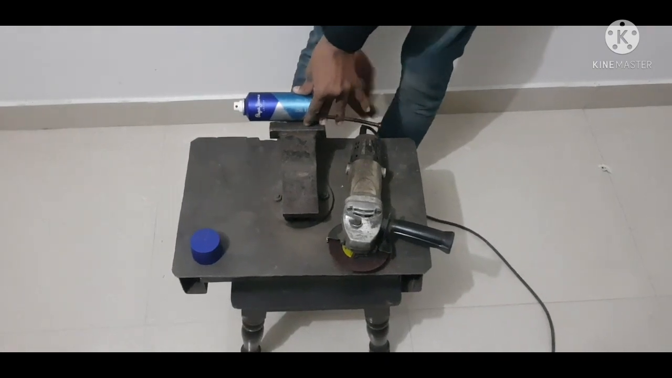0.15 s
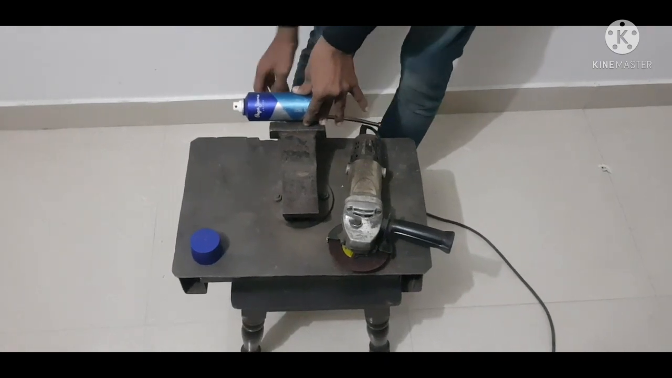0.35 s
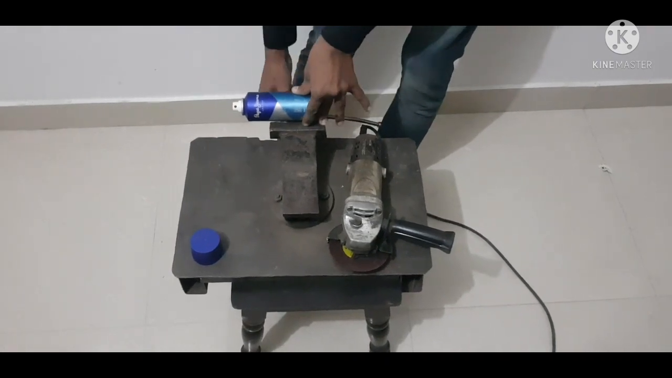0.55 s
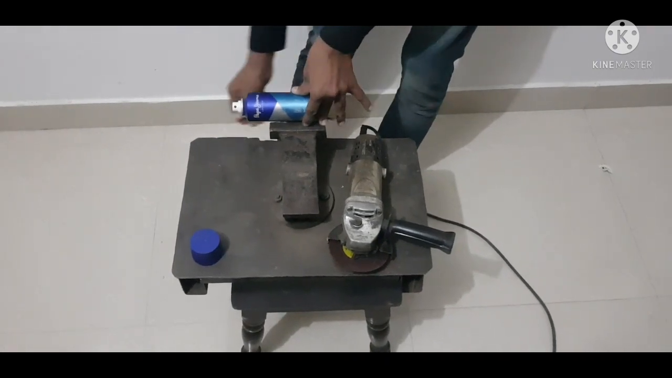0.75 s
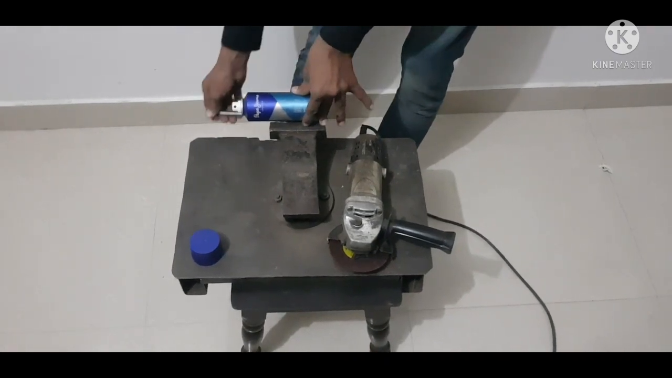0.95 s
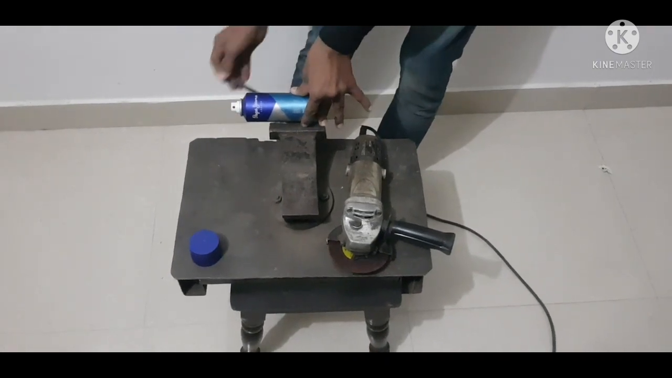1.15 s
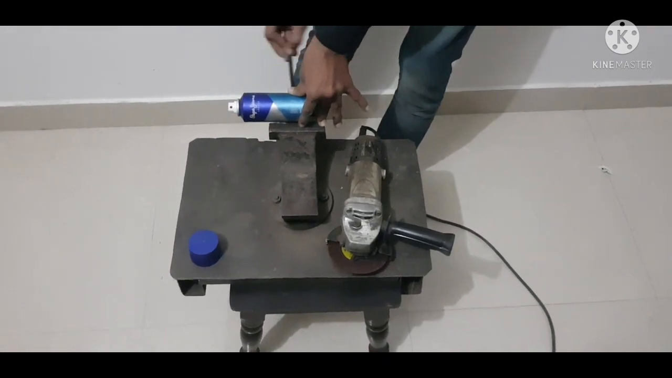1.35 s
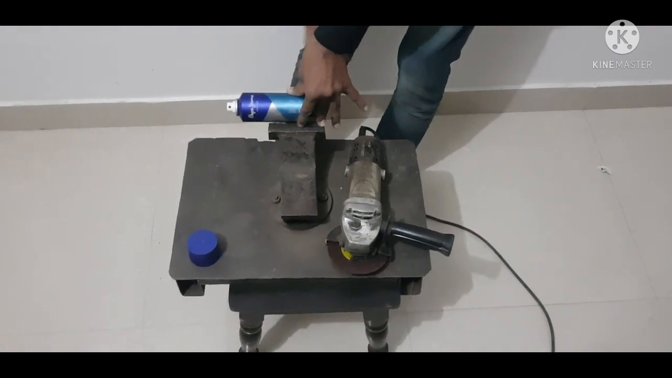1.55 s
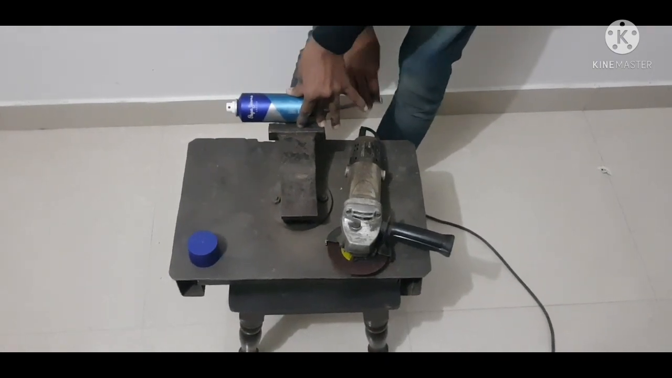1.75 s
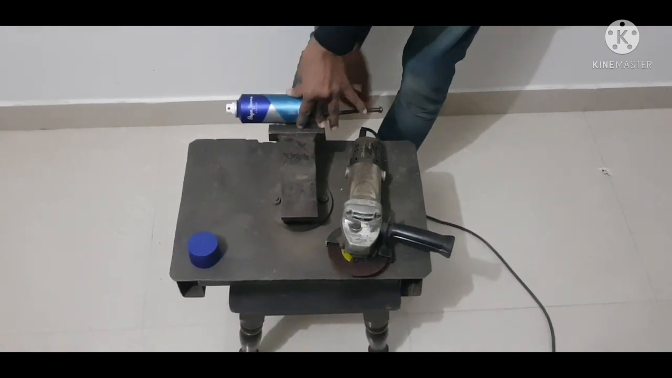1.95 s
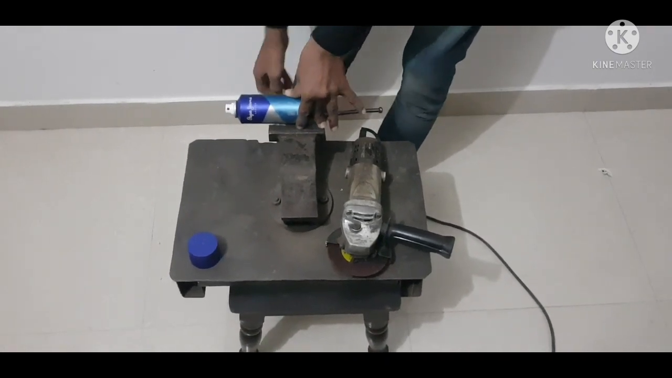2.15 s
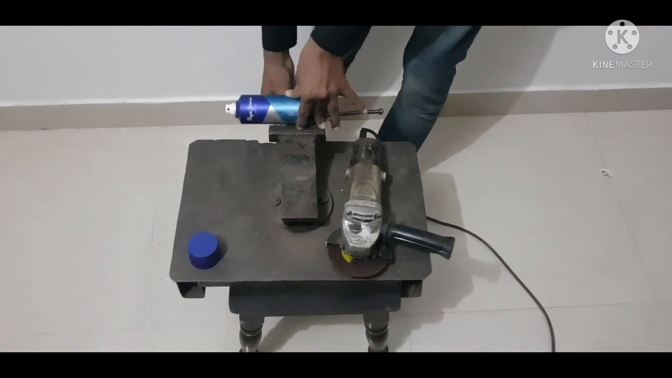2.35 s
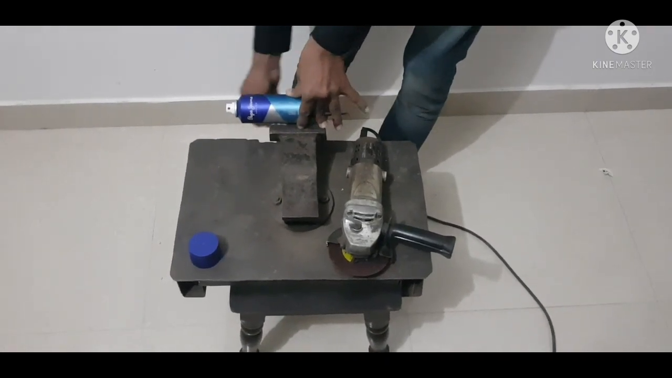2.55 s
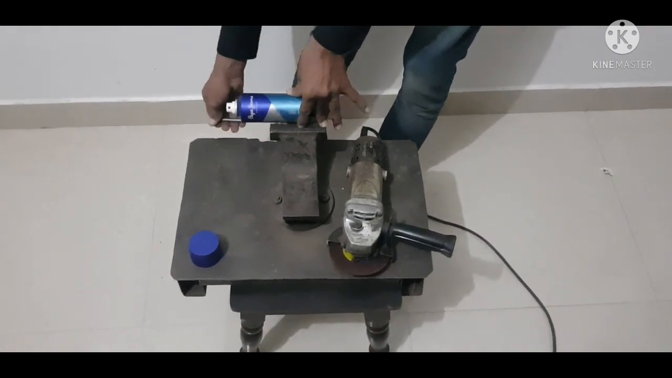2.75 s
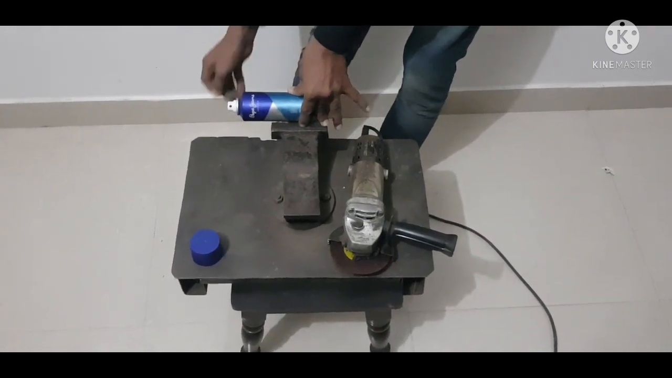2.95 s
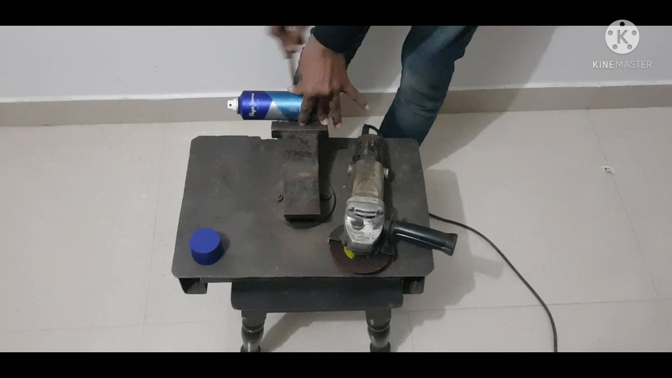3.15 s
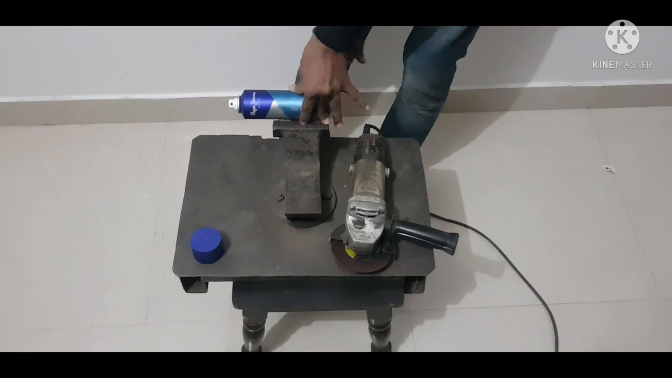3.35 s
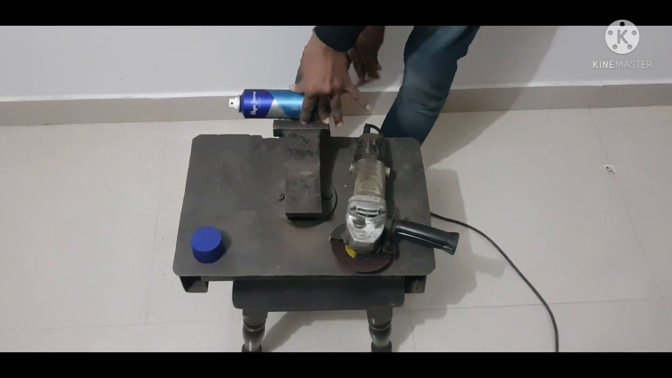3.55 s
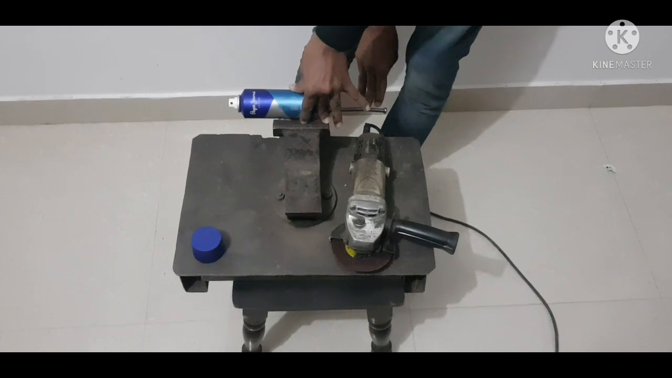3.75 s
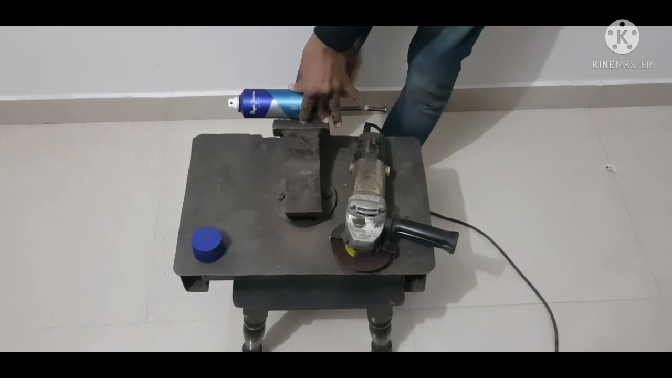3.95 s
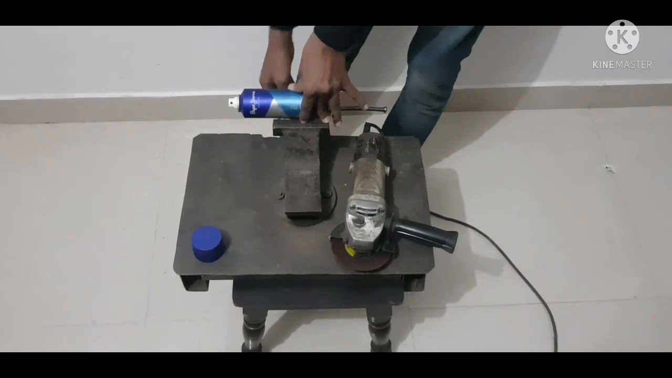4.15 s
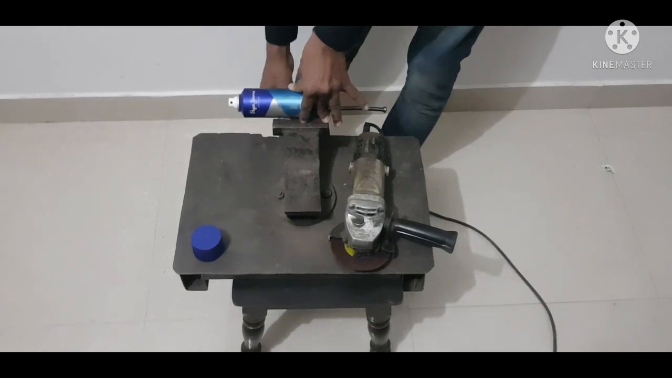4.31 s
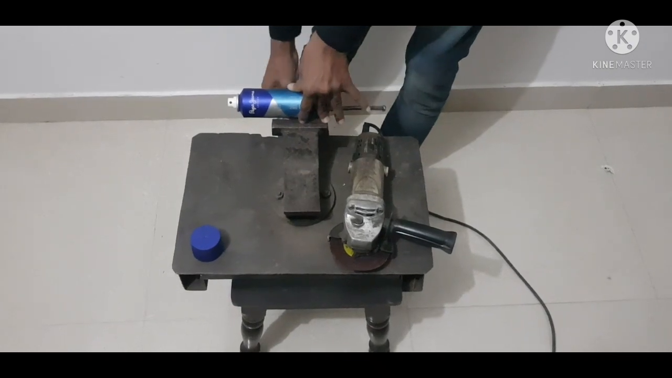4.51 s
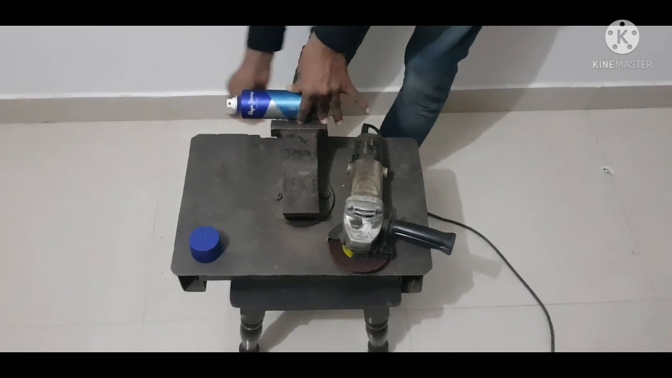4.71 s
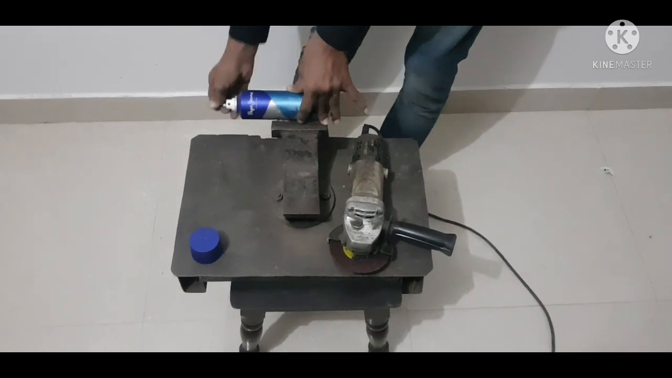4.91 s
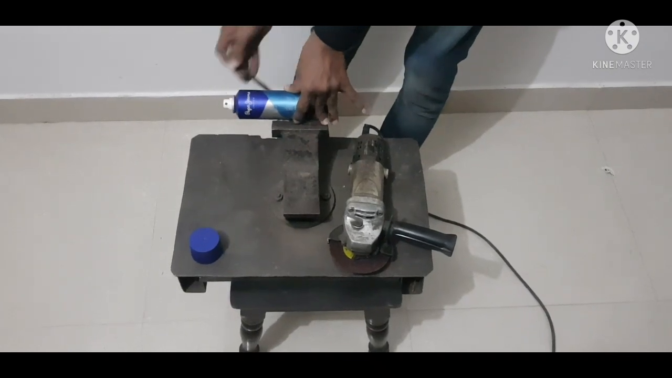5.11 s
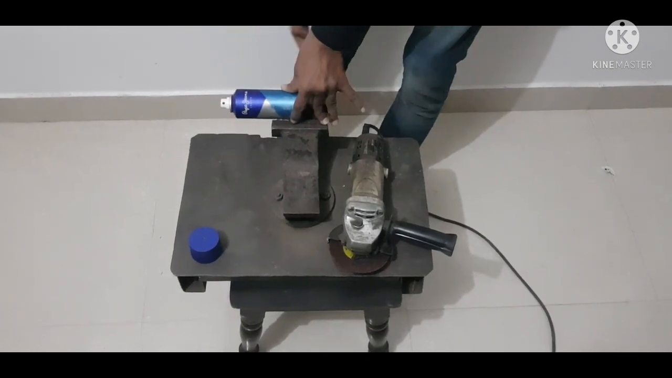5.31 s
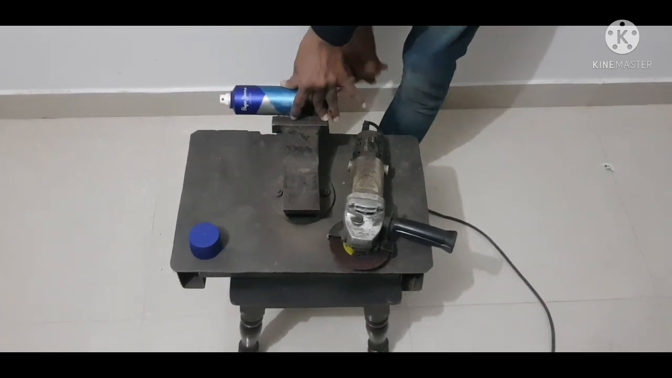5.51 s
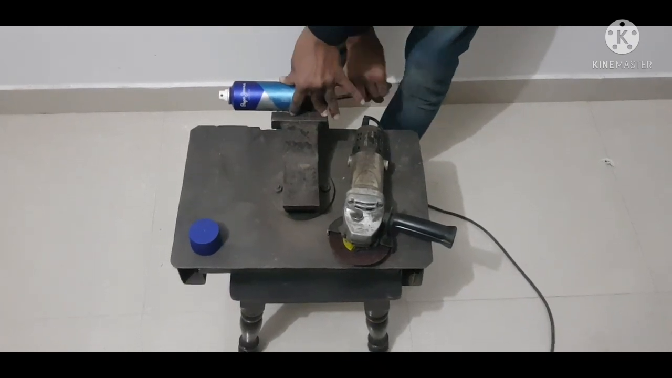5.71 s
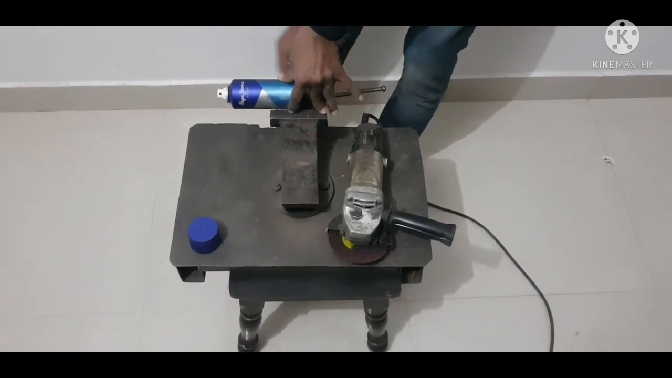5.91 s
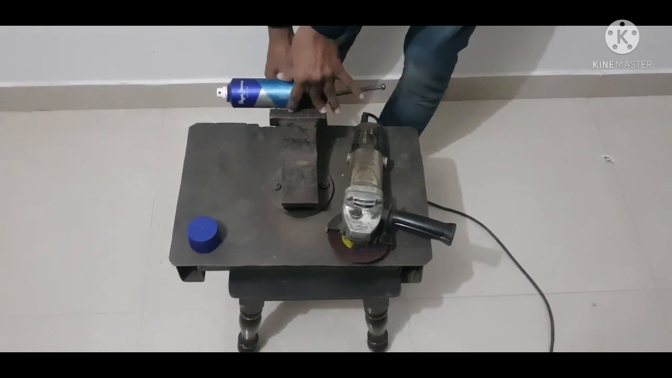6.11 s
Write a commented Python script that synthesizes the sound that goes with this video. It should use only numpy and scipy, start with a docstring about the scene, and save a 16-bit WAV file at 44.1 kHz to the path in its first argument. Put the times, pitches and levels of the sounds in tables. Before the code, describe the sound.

Sharp metal clanks alternate with short, rattling judders as a bench vise turns on a small ringing stand, with low air bumps and quiet hush.

```python
"""Bench vise wound by hand

A bench vise on a small steel-topped stand, wound in a bare tiled room and heard through two microphone ports.
On one half turn the bar scrapes through the screw head and clanks on its stop: rough noise and struck modes.
On the other the loose screw and jaw judder, as quick runs of contacts, and shake the stand into a drone.
Rubs and hand brushes are swelling friction noise; air rumbles and puffs low over a quiet hush and hiss."""
import sys
import numpy as np
from scipy import signal
from scipy.fft import rfft, irfft, next_fast_len
from scipy.io import wavfile
from scipy.ndimage import uniform_filter1d

SR = 44100
rng = np.random.default_rng(int(sys.argv[2]) if len(sys.argv) > 2 else 0)


def master(y):
    """Save y as 16-bit WAV."""
    cut = np.clip(np.atleast_2d(y).T, -1, 1)
    pcm = np.round(cut * 32767)  # scale
    wavfile.write(sys.argv[1], SR, pcm.astype(np.int16))


N = 276507

# modes of the stand: pitch_hz, level_db, t60_s
STAND_MODES = [(128.3, -7, 0.37), (188.5, -12.5, 0.67), (248, -1.5, 0.51), (366.5, 2.5, 0.52),
               (426, -8, 0.5), (490, -7.5, 0.51), (542.3, -7.5, 0.4), (582.4, -5.5, 0.32), (623, -15, 0.58),
               (697, -6, 0.22), (764.5, -6.5, 0.3), (782, -10, 0.32), (1010.4, -20.5, 0.21),
               (1103, -14.5, 0.5), (1272, -22.5, 0.36), (1436, -26, 0.34), (2116, -18, 0.47)]
# lasting tones of the bar: pitch_hz, level_db, t60_s
BAR_MODES = [(1012, -8, .46), (1120, -7, .42), (1405, -8, .68), (1540, -5, .58), (1850, -4, .38),
             (1976, -6, .33), (2417, -4, .33), (2789, -3, .28), (3268, -8, .36), (3590, -6, .25),
             (4210, -1, .3), (4593, 2, .27), (4680, -2, .24), (4936, -1, .3), (5496, 0, .33),
             (5561, -1, .35), (6002, -1, .22), (7578, 1, .24), (11060, 2, .2), (11250, 3, .19),
             (15419, -8, .17)]
# spectrum of a knock in the stand: frequency_hz, level_db
KNOCK_SPECTRUM = [(60, -32.5), (130, -12), (175, -22), (250, -4.5), (305, -10.5), (360, 0.5), (440, 3.5),
                  (620, 1), (690, -6.5), (950, -11.5), (1150, -9), (2000, -35.5)]


def clanks(tones_db=-7.0, favour_db=4.5, favour_width_hz=88):
    """Steel on steel: the bar clashes and rings in a colour given for each blow, and knocks the stand."""
    # the bar meets its stop: start_s, steel_db (before colouring), knock_db (in the stand),
    # then each blow's colour from low to high: clang_db, crack_db, ping_db, top_db, favoured_hz
    blows = [(0.739, -45, -54.5, -2, 0, -3.5, -16, 7550), (0.768, -43.5, -49.5, -1, -5, 7, -14.5, 1872),
             (0.779, -39, -52, 1, -8, 7, 1.5, 7570), (0.894, -40.5, -54.5, -0.5, 1.5, -0.5, -1, 5470),
             (0.9, -27.5, -40, -1.5, 3.5, 3.5, 7, 5100), (2.6, -32, -42.5, -12.5, -4, 4, -1.5, 7670),
             (2.605, -33.5, -42.5, 0.5, -5.5, 3, -2, 4940), (2.764, -33.5, -41.5, 4, 4.5, -0.5, -2, 4160),
             (4.689, -37.5, -48, -6, 2, -3.5, -5.5, 3575), (4.81, -37.5, -49, -3.5, -3.5, 1, 0, 4693),
             (4.8251, -16.5, -31.5, -6, -2.5, -0.5, 9.5, 7270)]
    out = np.zeros((2, N))
    for start_s, steel_db, knock_db, clang_db, crack_db, ping_db, top_db, favoured_hz in blows:
        blow = room(direct_db=-15.5)
        clash = crest(filtered(blow, steel()))
        tones = ring(BAR_MODES, attack_s=.002, apart=2.5, blur=.55, vary_db=2.8, detune=.002)
        colour = shape([(100, clang_db), (2600, clang_db), (4000, 0), (5600, crack_db), (7600, 0),
                        (10800, ping_db), (12400, ping_db), (14000, top_db), (20000, top_db)])

        def blow_colour(hz):
            """The colour, with the blow's favoured resonance lifted."""
            return colour(hz) * amp(favour_db / (1 + ((hz - favoured_hz) / favour_width_hz) ** 2))

        add(out, start_s, amp(steel_db) * filtered(clash + amp(tones_db) * tones, blow_colour))
        add(out, start_s, amp(knock_db) * crest(filtered(blow, shape(KNOCK_SPECTRUM))))
        stand = ring(STAND_MODES, attack_s=0.011, apart=0.6, blur=.15)
        add(out, start_s, amp(knock_db - 4.5) * stand)
    return out


def judders(rate_hz=340, scatter_db=3, swell=0.76, grip_s=0.0019, first_touch=0.21):
    """The screw slips in a run of contacts: rattle first, then heavier till the jaw seats and the stand drones."""
    # the screw judders: start_s, length_s, rattle_db, thud_db, drone_db (of the stand)
    runs = [(0.169, 0.058, -32.5, -22.5, -25.5), (1.28, 0.036, -71, -59, -74),
            (1.967, .058, -36, -33.5, -30), (3.893, 0.066, -36, -29.5, -31),
            (5.678, 0.037, -51.5, -50, -57.5), (5.794, 0.063, -35.5, -28, -26.5)]
    # dull body of the run: frequency_hz, level_db
    thud_spectrum = [(50, -32.5), (90, -20.5), (122, -6.5), (160, -19.5), (200, -7.5), (300, -11),
                     (380, -2), (480, -9), (600, -2), (730, 3), (930, -13), (1120, -8.5), (1500, -16.5),
                     (3000, -42)]
    # bright loose metal of the run: frequency_hz, level_db
    rattle_spectrum = [(500, -18), (1000, -10), (1500, -5), (2150, 0), (2700, -3.5), (3300, -12),
                       (5500, -14), (7000, -23), (8700, -31), (10800, -21.5), (12500, -38), (15500, -44)]
    out = np.zeros((2, N))
    for start_s, length_s, rattle_db, thud_db, drone_db in runs:
        count = max(2, round(length_s * rate_hz))
        order = np.arange(count)
        when = (order + rng.random(count) * (order > 0)) / count  # 0 to 1 through the run
        size = amp(scatter_db * rng.standard_normal(count)) * rng.choice([-1, 1], count)
        size *= np.minimum(1, first_touch + when * length_s / grip_s)  # the first touches are light
        sample = (when * length_s * SR).astype(int)

        def contacts(weight, answer):
            """Every contact sets off the same answer at its own size."""
            return signal.fftconvolve(np.bincount(sample, size * weight)[None], answer, axes=1)

        rattle = contacts(amp(-4 * when), room(direct_db=-7, life=0.89))
        thud = contacts((when + .15) ** swell, room(direct_db=-4, life=0.94))
        drone = ring(STAND_MODES, attack_s=0.011, apart=0.17, blur=.15)
        add(out, start_s, amp(rattle_db) * crest(filtered(rattle, shape(rattle_spectrum))))
        add(out, start_s, amp(thud_db) * crest(filtered(thud, shape(thud_spectrum))))
        add(out, start_s + .25 * length_s, amp(drone_db) * drone)
    return out


def slides(bar_tones_db=-8, edge_s=0.021):
    """The sliding bar and the turning screw scrape; the rough force excites the bar and the stand."""
    # the bar slides through the screw head, gathering or losing speed: start_s, length_s,
    # rub_db (in the stand, at the end), hiss_db (of the steel, at the end), growth_db (over the slide)
    strokes = [(0.68, 0.042, -59.5, -56.5, 15), (0.815, 0.094, -52, -49.5, 5.5),
               (1.01, 0.038, -49.5, -66, 1), (2.53, 0.042, -50, -45, 11), (2.65, 0.12, -44.5, -47.5, 1),
               (4.59, 0.083, -51.5, -47, 23.5), (4.715, 0.12, -51, -50, -5.5),
               (4.96, 0.11, -53.5, -63, -11)]
    # the screw rubs dully in its thread: middle_s, length_s, level_db
    thread_rubs = [(0.02, 0.089, -60), (0.15, 0.058, -69), (0.65, 0.094, -68), (1.295, 0.076, -55.5),
                   (1.935, 0.08, -68.5), (2.43, 0.13, -69.5), (4.6, .05, -67.5)]
    # sliding steel against struck steel: frequency_hz, level_db
    scrape_spectrum = [(700, -3.5), (1800, 4), (4000, 2.5), (8000, -4), (11300, -5.5), (13000, -8.5),
                       (15400, -7.5)]
    t = np.arange(N) / SR
    rub, hiss = swells(thread_rubs), np.zeros(N)
    for start_s, length_s, rub_db, hiss_db, growth_db in strokes:
        end_s = start_s + length_s
        # the bar takes hold and lets go within edge_s
        contact = np.interp(t, [start_s - edge_s, start_s, end_s, end_s + edge_s], [0, 1, 1, 0])
        speed = contact * amp(growth_db * np.clip((t - start_s) / length_s - 1, -1, 0))
        rub += amp(rub_db) * speed
        hiss += amp(hiss_db) * speed
    held = amp(-60 * t[:SR] / .5)  # the hand damps what rings
    stand = crest(filtered(room(direct_db=-3.0), shape(KNOCK_SPECTRUM)))
    stand += amp(-2) * held * ring(STAND_MODES, attack_s=.01, apart=0.28, blur=0.36)
    bar = crest(filtered(room(direct_db=-10), steel()))
    bar += amp(bar_tones_db) * held * ring(BAR_MODES, attack_s=.002, apart=2.5, blur=.6, detune=.004)
    return friction(rub, stand) + friction(hiss, filtered(bar, shape(scrape_spectrum)))


def brushes(half_width_octaves=1.3):
    """Skin and sleeve rustle on the handle: friction noise in one broad band a stroke."""
    # the hand brushes along the handle: middle_s, length_s, level_db, centre_hz
    strokes = [(0.01, 0.026, -70.5, 1500), (1.736, 0.2, -70, 3400), (3.076, 0.66, -75, 4000),
               (3.281, 0.16, -70.5, 5540), (3.454, .12, -71, 1770), (3.687, .32, -75, 3520),
               (4.304, .3, -80.5, 2203), (5.17, .07, -71.5, 3015)]
    answer = room(direct_db=-9.5)
    out = np.zeros((2, N))
    for middle_s, length_s, level_db, centre_hz in strokes:
        band = lambda hz: 1 / (1 + (np.log2((hz + 1) / centre_hz) / half_width_octaves) ** 2)
        out += friction(swells([(middle_s, length_s, level_db)]), filtered(answer, band))
    return out


def air(puff_life_s=0.0099, still_air_db=-77):
    """Moving air rumbles on the ports, with a few soft bumps that reach each port at its own strength."""
    # draughts from the swinging arm: middle_s, length_s, level_db
    draughts = [(0.11, 0.16, -60.5), (0.44, 0.19, -45.5), (0.57, 0.22, -49.5), (2.15, .12, -75),
                (2.72, 0.27, -46), (2.86, 0.18, -48.5), (3.05, 0.27, -55.5), (3.69, 0.077, -64),
                (4.08, 0.27, -66), (4.63, 0.078, -63), (5.04, .2, -60), (5.42, .26, -60), (5.85, 0.24, -46),
                (6.2, 0.36, -62.5)]
    # soft low bumps: start_s, peak_db (nominal, at the right port), pitch_hz (nominal)
    puffs = [(0.411, -53, 68.5), (0.499, -43.5, 74), (0.56, -36, 76), (1.51, -56, 158.8), (1.56, -60, 160),
             (2.678, -33, 65), (2.861, -58, 68), (4.467, -41.5, 77.6), (5.326, -51, 85),
             (5.379, -51.5, 85.6), (5.489, -53.5, 141), (6.069, -46, 68.3)]
    low = shape([(25, -17), (45, -5.0), (62, -0.5), (90, -12.0), (140, -19), (300, -35.5)])
    rumble = unit(filtered(rng.standard_normal((3, N)), low))
    ports = rumble[:2] * amp([[-3], [2]]) + amp(-10) * rumble[2]  # one rumble a port, one common to both
    out = (amp(still_air_db) + swells(draughts)) * ports
    t = np.arange(SR // 5) / SR
    envelope = t / puff_life_s * np.exp(1 - t / puff_life_s)
    for start_s, peak_db, pitch_hz in puffs:
        port_pitch_hz = pitch_hz * np.exp(.15 * rng.normal(size=(2, 1)))
        slap = envelope * np.sin(2 * np.pi * port_pitch_hz * t)
        add(out, start_s, amp(peak_db + np.array([[-6], [0]])) * slap)
    return filtered(out, shape([(48, 0), (400, 0)]))


def floor(level_db=-69):
    """Steady quiet background hush and hiss: shaped noise, separate at each port."""
    # background hush and hiss: frequency_hz, level_db
    quiet = [(25, -22), (58, -3), (100, -21), (138, -7), (250, -20), (365, -19), (550, -22.5), (900, -30.5),
             (1500, -31), (4000, -34.5), (6500, -38.5), (8600, -41.5), (11000, -27.5), (15500, -32)]
    return amp(level_db) * unit(filtered(rng.standard_normal((2, N)), shape(quiet)))


def steel():
    """Gain of the steel's resonances; each call weights them anew for another point of contact."""
    # resonances of bar and vise together: centre_hz, width_hz, level_db
    resonances = [(1480, 260, -7), (1850, 90, 0), (2420, 140, -7), (2780, 180, -5), (3120, 150, -8),
                  (3560, 250, -7), (4220, 80, -2), (4620, 150, 0), (4930, 120, -2), (5520, 200, -1),
                  (6000, 280, -4), (6700, 300, -11), (7590, 190, -2), (8750, 600, -9), (10300, 500, -14),
                  (11210, 220, 3), (12050, 350, -8), (15380, 150, -9)]
    peaks = [(centre, width, amp(db + 1.5 * rng.normal())) for centre, width, db in resonances]

    def gain(hz):
        """Resonance powers added up, falling away below 1 kHz."""
        power = sum(g ** 2 / (1 + (2 * (hz - centre) / width) ** 2) for centre, width, g in peaks)
        return np.sqrt(power) * np.minimum(1, hz / 1000) ** 2

    return gain


def ring(modes, attack_s, apart, blur, vary_db=1.0, detune=0):
    """Struck modes, varied by blow; phases differ by port (`apart`, rad) and drift (`blur`, rad per 10 ms)."""
    t = np.arange(SR) / SR
    tones = np.zeros((2, SR))
    for hz, db, t60 in modes:
        # the room scatters the tones, so the phase wanders
        drift = np.interp(t, np.arange(100) / 100, np.cumsum(rng.standard_normal(100)))
        strength_db = db + vary_db * rng.normal()
        cycles = hz * (1 + detune * rng.normal()) * t + rng.random()
        phase = 2 * np.pi * cycles + blur * drift + apart * rng.normal(size=(2, 1))
        tones += amp(strength_db - 60 * t / np.clip(t60, .02, .9)) * np.sin(phase)
    return crest(tones * (1 - np.exp(-t / attack_s)))


def friction(force, body, grain_db=5):
    """A force made rough by countless small high spots, played through a body."""
    grain = np.repeat(amp(grain_db * rng.standard_normal(N // 64 + 1)), 64)[:N]
    spots = unit(rng.standard_normal(N) * grain)
    return signal.oaconvolve((force * spots)[None], body / np.linalg.norm(body[0]), axes=1)[:, :N]


def swells(rows, end_drop_db=9):
    """Gain of strokes that grow and fade smoothly with the arm's speed, end_drop_db weaker at their ends."""
    t = np.arange(N) / SR
    power = np.zeros(N)
    for middle_s, length_s, level_db in rows:
        away = np.minimum(100, (2 * (t - middle_s) / length_s) ** 2)
        power += amp(level_db - end_drop_db * away) ** 2
    return np.sqrt(power)


def room(direct_db, life=1):
    """One second of direct sound and dense echoes, alike at both ports only in the bass; `life` scales t60."""
    # decay of the tiled room, before `life` (shorter for parts clamped tight): frequency_hz, t60_s
    decay = [(100, 0.46), (260, 0.48), (700, 0.36), (1800, 0.45), (4800, .33), (8000, 0.28), (11000, 0.25),
             (16000, .18)]
    # likeness of the two ports: frequency_hz, correlation (-1 to 1)
    likeness = [(100, 0.97), (350, .93), (600, 0.23), (1100, 0), (2500, 0.0086), (12000, 0.28)]
    hz, t, z = signal.stft(rng.standard_normal((2, SR)), SR, nperseg=256)
    turn = np.arccos(np.clip(along(likeness, hz), -1, 1))[:, None] / 2
    fade = amp(-60 * t / (life * along(decay, hz)[:, None]))
    z = z * fade * np.array([np.cos(turn), np.sin(turn)])
    mid, side = signal.istft(z, SR, nperseg=256)[1][:, :SR]
    tail = np.array([mid + side, mid - side])
    tail /= np.linalg.norm(tail[0])
    tail[:, 0] += amp(direct_db)
    return tail


def amp(db):
    """Decibels to gain."""
    return 10 ** (np.asarray(db) / 20)


def unit(x):
    """Scaled to rms 1."""
    return x / np.sqrt(np.mean(x ** 2) + 1e-20)


def crest(x):
    """Scaled so that the loudest 20 ms have rms 1."""
    return x / np.sqrt(uniform_filter1d(np.mean(x ** 2, axis=0), size=SR // 50).max() + 1e-20)


def along(points, hz):
    """(Hz, value) points joined up on a log frequency axis."""
    f, v = np.transpose(points)
    return np.interp(np.log(hz + 1), np.log(f + 1), v)


def shape(points):
    """The gain of a (Hz, dB) spectrum, falling away beyond its ends."""
    low_hz, high_hz = points[0][0], points[-1][0]
    return lambda hz: amp(along(points, hz)) * np.minimum(1, hz / low_hz) ** 2 / np.maximum(1, hz / high_hz) ** 2


def filtered(x, gain):
    """x through the causal, minimum-phase filter that has this gain over frequency."""
    m = 2 * next_fast_len(x.shape[-1] // 2 + SR // 8)
    cepstrum = irfft(np.log(np.maximum(gain(np.fft.rfftfreq(m, 1 / SR)), 1e-6)))
    cepstrum[..., 1:m // 2] *= 2  # folding the cepstrum makes the filter causal
    cepstrum[..., m // 2 + 1:] = 0
    return irfft(rfft(x, m) * np.exp(rfft(cepstrum)), m)[..., :x.shape[-1]]


def add(track, s, x):
    """Mix x into the track from time s."""
    start = max(0, round(s * SR))
    track[:, start:start + x.shape[-1]] += x[..., :max(0, N - start)]


def scene():
    """The vise reaches each port with its own colour; air and hush lie beneath."""
    # colour between the ports: frequency_hz, left_minus_right_db
    lean = [(100, -3.5), (500, -.5), (1500, -3.5), (4500, -3), (7500, -2.5), (10000, 11), (11300, 2.5),
            (12600, 6.5), (14000, -9.5), (15500, -6.5)]
    vise = clanks() + judders() + slides() + brushes()
    vise = filtered(vise, lambda hz: amp(np.array([[1], [-1]]) * along(lean, hz) / 2))
    return vise + air() + floor()


def record(dry, top_hz=15550):
    """The recorder's steep low-pass holds what lies above its band limit 90 dB down."""
    return signal.sosfilt(signal.ellip(10, .1, 90, top_hz, fs=SR, output="sos"), dry)


dry = scene()
out = record(dry)
master(out)
```